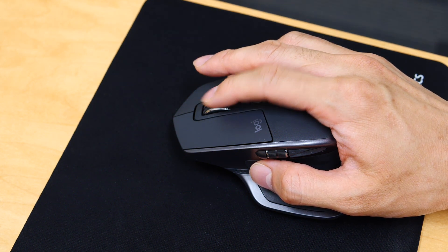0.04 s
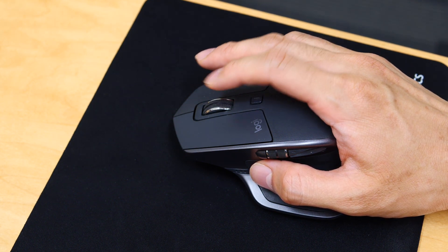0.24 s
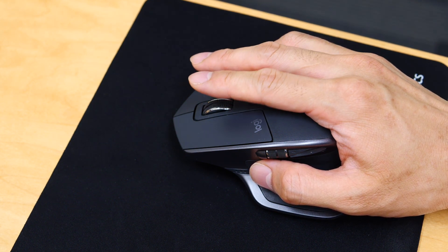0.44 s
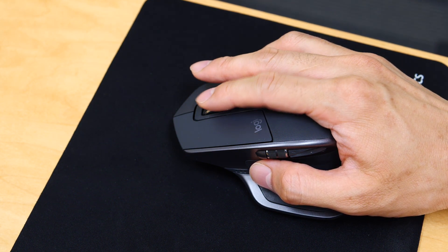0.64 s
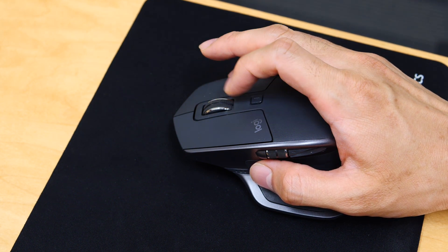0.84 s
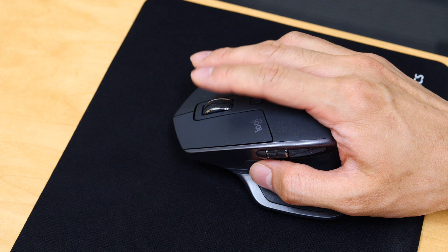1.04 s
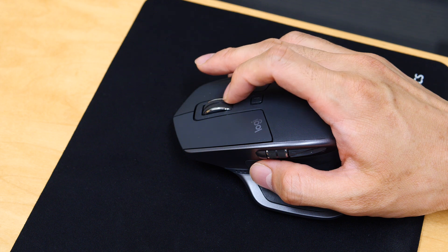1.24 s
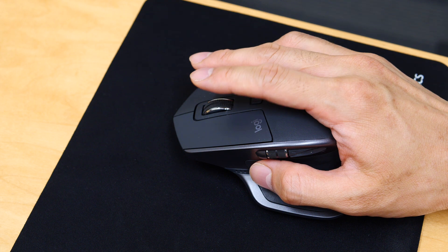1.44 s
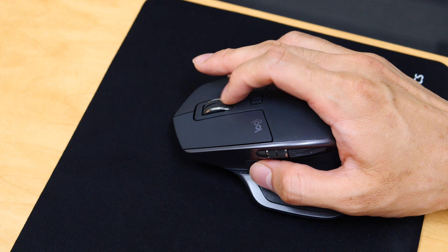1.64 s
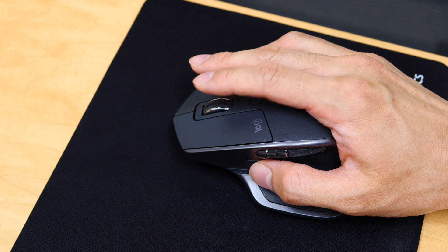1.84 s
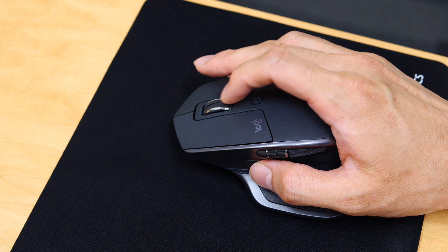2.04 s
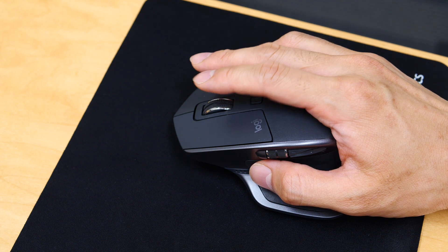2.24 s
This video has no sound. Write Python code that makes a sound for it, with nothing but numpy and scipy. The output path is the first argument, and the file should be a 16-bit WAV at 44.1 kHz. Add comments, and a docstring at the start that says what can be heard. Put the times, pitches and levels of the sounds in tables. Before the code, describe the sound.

Close by in a quiet room, a mouse scroll wheel ticks through four short, fast flicks. Its mechanism shifts with a bright clack before the first and again after the third, amid soft finger bumps and faint hiss.

```python
"""A soft rub and bump, then a rattling clack with bright metal pings: a mouse wheel's clutch shifts.
A finger flicks the ratchet wheel four times; after the third flick the clutch shifts back.
At each detent the pawl scrapes briefly, then knocks the plastic shell, which rings faintly.
The mouse is on a desk in a quiet room: soft reverberation over low rumble and hiss."""
import sys
import numpy as np
from scipy import signal
from scipy.fft import rfft, irfft, next_fast_len
from scipy.io import wavfile
from scipy.ndimage import uniform_filter1d

SR = 44100
rng = np.random.default_rng(int(sys.argv[2]) if len(sys.argv) > 2 else 0)


def put_to_file(sound):
    """Save the sound as 16-bit audio at rate SR, in the file named by the first command-line argument."""
    columns = np.atleast_2d(sound).T  # one column per channel
    safe = np.clip(columns, -1, 1)
    whole_steps = np.round(safe * 32767)
    wavfile.write(sys.argv[1], SR, whole_steps.astype(np.int16))


N = 105840

# room noise spectrum: f/Hz, relative density/dB
FLOOR_SPECTRUM = [(29, -42), (50, -9.5), (146, 0.5), (253, -5), (322, -15), (759, -12.5), (1200, -18),
                  (1750, -20), (9310, -23.5), (15000, -27)]
# room noise, side re mid: f/Hz, gain/dB
FLOOR_SIDE_GAIN = [(30, -7), (130, -52), (800, -7.5), (5000, -5.5)]
# room tail decay: f/Hz, T60/s
TAIL_DECAY = [(200, 0.39), (2000, 0.27), (14000, 0.4)]
# room tail re its input: f/Hz, gain/dB
TAIL_GAIN = [(200, 12.5), (500, 5), (1300, -8.5), (3000, -2.5), (7000, -4.5), (11000, -14.5), (15000, -14)]
# reverberation, side re mid: f/Hz, gain/dB
ROOM_SIDE_GAIN = [(150, -61), (800, -9), (2500, -6.5), (7000, -13), (14000, -5.5)]
# room sends: ratchet and taps/dB, clutch/dB, bumps and tones/dB
ROOM_SENDS_DB = (-1.5, -1.5, -3.5)
# microphone response: f/Hz, gain/dB
MIC_RESPONSE = [(30, -20), (60, -33), (95, 0), (130, -3), (300, 0), (14000, -2), (16000, -16)]
# modes of the mouse on the desk: f/Hz, level/dB, T60/s
SHELL_MODES = [(159.8, -58.5, 0.71), (351.3, -59, 0.37), (749, -55, 0.16), (949, -42, 0.036),
               (1310, -52, 0.14), (1496, -58, 0.26), (1591, -67, .095), (1800, -55.5, 0.23),
               (2508, -53.5, 0.17), (2888, -50.5, 0.1), (4760, -49.5, 0.016)]
# finger rubs, clutch motor whine, rings after clutch blows: centre t/s, 1/e half-width/s, f/Hz, level/dB
TONE_EVENTS = [(0.121, 0.03, 1058, -58), (0.743, 0.01, 1564, -57), (0.777, 0.0053, 1310, -42.5),
               (0.919, 0.017, 1350, -48), (1.256, 0.0054, 960, -39), (1.708, 0.0091, 959, -35),
               (1.712, 0.0032, 3145, -40.5), (1.722, 0.004, 1327, -34), (1.817, 0.014, 914, -34.5),
               (1.882, 0.0012, 4630, -38)]

# Contact levels are relative, ahead of each source's gain; their spectra set colour only.
# bumps on the shell: t/s, level/dB
BUMP_EVENTS = [(.1670, -29.5), (.1690, -35), (.226, -31), (.299, -32.5), (.893, -31), (1.272, -33),
               (2.181, -31.5), (2.205, -36)]
# bump: f/Hz, level/dB
BUMP_SPECTRUM = [(100, -27.5), (350, -10.5), (650, -13.5), (760, -0.5), (950, -1), (1120, -4.5),
                 (1330, 3.5), (2000, -16.5), (2550, -12), (3100, -25), (12000, -36.5)]
# clutch lever blows: t/s, thud level/dB, crack level/dB
LEVER_BLOWS = [(0.2334, -18.5, -26.5), (.2352, -16.5, -20.5), (0.2386, -23.5, -43), (0.243, -22, -43),
               (.2470, -54, -28.5), (0.3152, -27.5, -30.5), (1.7108, -26, -26.5), (1.794, -20.5, -26.5),
               (1.796, -20, -18.5), (1.7977, -17, -20), (1.8011, -27, -29.5), (1.8081, -28, -31),
               (1.8107, -22.5, -35), (1.8776, -28, -31)]
# lever thud, shifting out: f/Hz, level/dB
THUD_OUT_SPECTRUM = [(100, -36), (330, -15), (660, -21), (770, 0), (900, -2.5), (1070, 1), (1330, 3.5),
                     (1600, -2), (1850, -3), (2200, -11), (3000, -12.5), (6000, -49)]
# lever thud, shifting back: f/Hz, level/dB
THUD_BACK_SPECTRUM = [(100, -35.5), (480, -16.5), (700, -17.5), (890, 1.5), (1130, -6.5), (1500, 1.5),
                      (1850, -1), (2300, -16), (3100, -15.5), (6000, -51)]
# lever crack: f/Hz, level/dB
CRACK_SPECTRUM = [(800, -34), (2500, 8.5), (3500, 5.5), (4800, 10.5), (5600, -0.5), (6500, 8), (7500, -3.5),
                  (8600, 6.5), (11500, -13.5), (15000, -2.5)]
# metal-on-metal clutch contacts: t/s, level/dB
PING_EVENTS = [(.2275, -31), (.2317, -13), (.2350, -17.5), (.2440, -21), (.2504, -19.5), (.3150, -23),
               (1.7115, -36), (1.7906, -28), (1.7947, -43), (1.8067, -17.5), (1.8131, -24), (1.8174, -25),
               (1.8781, -22.5)]
# metal ping: f/Hz, level/dB
PING_SPECTRUM = [(3000, -32), (7500, -13.5), (9800, -7.5), (10900, 4.5), (11600, -5.5), (12500, -11),
                 (16000, -35)]
# taps of wheel play and clutch rebound: t/s, level/dB, pitch f/Hz
TAP_EVENTS = [(.3170, -24.5, 1640), (0.7082, -29.5, 1520), (0.771, -31.5, 1450), (.8880, -29.5, 1400),
              (1.3197, -29, 1345), (1.8783, -25.5, 1485), (2.094, -37.5, 1490), (2.178, -32, 1390)]
# tap pitched at 1400 Hz: f/Hz, level/dB
TAP_SPECTRUM = [(200, -7.5), (600, -16), (1400, 11.5), (1950, -15.5), (3900, -16.5), (4600, -4.5),
                (5300, -15.5), (11000, -17.5), (15000, -33)]
# detents passing the pawl: t/s, knock level/dB, scrape level/dB
DETENT_EVENTS = [(0.7999, -29, -37.5), (0.8124, -27, -38), (0.825, -25, -35), (0.8369, -25.5, -41),
                 (0.8606, -31, -42), (0.9067, -39.5, -55.5), (1.2064, -31.5, -46), (1.2235, -29, -39.5),
                 (1.2365, -26, -35), (1.2498, -26.5, -42), (1.2658, -30, -42.5), (1.3061, -32, -54),
                 (1.6432, -32.5, -46), (1.6575, -29, -41.5), (1.6702, -28.5, -36.5), (1.682, -26, -37),
                 (1.6932, -28, -42), (2.0422, -29.5, -40.5), (2.0579, -27.5, -38), (2.0695, -26.5, -35),
                 (2.0833, -26, -38), (2.104, -29, -45.5), (2.193, -45.5, -55)]
# pawl scrape: f/Hz, level/dB
SCRAPE_SPECTRUM = [(1000, -30.5), (2200, -0.5), (3000, -2.5), (3550, -7.5), (4700, 0), (5600, -6.5),
                   (6600, -2.5), (9000, -11), (10900, 1), (12300, -13), (14000, -7.5), (16000, -11)]
# pawl knock at mean strength: f/Hz, level/dB
KNOCK_SPECTRUM = [(150, -29), (370, -18.5), (620, -24.5), (930, -1), (1150, -8), (1450, 5), (1780, -0.5),
                  (1980, -12), (2150, -2.5), (2500, -38), (2850, -14), (3400, -31.5), (4700, -24),
                  (9000, -40)]


def amp(db):
    """Decibels to gain."""
    return 10 ** (np.asarray(db) / 20)


def curve_at(points, hz):
    """Interpolate (f/Hz, value) points on a log frequency axis."""
    knots_hz, values = np.transpose(points)
    return np.interp(np.log(hz + 1), np.log(knots_hz + 1), values)


def decay(t, t60_s):
    """Exponential fall, 60 dB in t60_s."""
    return amp(-60 * t / t60_s)


def filtered(x, gains, top_hz=np.inf):
    """Zero-phase filter through (f/Hz, gain/dB) points, cut at top_hz."""
    size = next_fast_len(N + SR // 2)
    hz = np.fft.rfftfreq(size, 1 / SR)
    response = amp(curve_at(gains, hz)) * (hz < top_hz)
    return irfft(rfft(x, size) * response, size)[..., :N]


def detuned(spectrum, ratio):
    """Spectrum shifted in pitch."""
    return [(hz * ratio, db) for hz, db in spectrum]


def minimum_phase(spectrum, size=2048):
    """Causal impulse with the given spectrum."""
    hz = np.fft.rfftfreq(size, 1 / SR)
    cepstrum = irfft(np.log(amp(curve_at(spectrum, hz))))
    cepstrum[1:size // 2] *= 2
    cepstrum[size // 2 + 1:] = 0
    return irfft(np.exp(rfft(cepstrum)))


def burst(t60_s, size=2048):
    """Micro-contact cluster that swells and dies; even spectrum, unit energy."""
    t = np.arange(size) / SR
    envelope = np.sqrt(t) * decay(t, t60_s)
    envelope /= envelope.max()
    cluster = rng.standard_normal(size) * envelope
    for _ in range(6):
        whitened = irfft(np.exp(1j * np.angle(rfft(cluster))))
        cluster = whitened * np.minimum(1, 2 * envelope)
    return cluster / np.linalg.norm(cluster)


def diffuse_noise(size=2048):
    """Two noises of about 1 s with even short-time spectra."""
    noise = rng.standard_normal((2, SR))
    for _ in range(4):
        frames = signal.stft(noise, nperseg=size)[2]
        noise = signal.istft(np.exp(1j * np.angle(frames)), nperseg=size)[1]
    return noise / noise.std()


def strikes(events, spectrum, t60_s=None, vary_db=0):
    """Contacts at (t/s, level/dB): clean impulses, or bursts given t60_s. vary_db scatters colour."""
    out = np.zeros(N + SR)
    hz, spectrum_db = np.transpose(spectrum)
    for start_s, db in events:
        varied_db = spectrum_db + vary_db * rng.standard_normal(len(hz))
        body = minimum_phase(np.transpose([hz, varied_db]))
        body /= np.abs(body).max()
        hit = signal.fftconvolve(body, burst(t60_s)) if t60_s else body
        out[round(start_s * SR):][:len(hit)] += amp(db) * hit
    return out[:N]


def background(floor_db=-60, hum_db=-49.5, hum_hz=149.7, hum_peak_s=0.764, hum_half_width_s=0.11):
    """Room rumble and hiss; a low hum swells once."""
    mid, side = filtered(rng.standard_normal((2, N)), FLOOR_SPECTRUM)
    side = filtered(side, FLOOR_SIDE_GAIN)
    floor = amp(floor_db) * np.array([mid + side, mid - side]) / mid.std()
    t = np.arange(N) / SR
    swell = np.exp(-((t - hum_peak_s) / hum_half_width_s) ** 2)
    return floor + amp(hum_db) * swell * np.sin(2 * np.pi * hum_hz * t)


def room(x):
    """Early desk reflections, then a diffuse tail with a faint, slower late decay."""
    early_db, early_t60_s, early_lag_s = -6, 0.0513, 0.001011
    tail_lag_s, late_db, late_t60_s = 0.008, -25, 0.95
    hz, t, frames = signal.stft(diffuse_noise(), SR, nperseg=256)
    t60_s = curve_at(TAIL_DECAY, hz)[:, None]
    unit_energy = np.sqrt(2 * np.log(1000) / (t60_s * SR))
    gain = amp(curve_at(TAIL_GAIN, hz))[:, None] * unit_energy
    envelope = decay(t, t60_s) + amp(late_db) * decay(t, late_t60_s)
    tail = signal.istft(frames * gain * envelope, SR, nperseg=256)[1]
    response = np.pad(tail, ((0, 0), (round(tail_lag_s * SR), 0)))
    early = amp(early_db) * np.array([burst(early_t60_s), burst(early_t60_s)])
    response[:, round(early_lag_s * SR):][:, :early.shape[1]] += early
    mid, side = signal.fftconvolve(x[None], response, axes=1)[:, :N]
    side = filtered(side, ROOM_SIDE_GAIN)
    return np.array([mid + side, mid - side])


def shell(x):
    """Contacts plus the faint ring they excite in the shell's modes."""
    t = np.arange(SR // 2) / SR
    ring = sum(amp(db) * decay(t, t60_s) * np.cos(2 * np.pi * hz * t) for hz, db, t60_s in SHELL_MODES)
    return x + signal.fftconvolve(x, ring)[:N]


def wavering_tones(waver_rms_hz=75):
    """Brief tones: finger rubs, the clutch motor's whine, rings after clutch blows."""
    t, out = np.arange(N) / SR, np.zeros(N)
    for centre_s, half_width_s, hz, db in TONE_EVENTS:
        waver = uniform_filter1d(rng.standard_normal(N), size=256)
        phase = 2 * np.pi * np.cumsum(hz + waver_rms_hz * waver / waver.std()) / SR
        swell = np.exp(-((t - centre_s) / half_width_s) ** 2)
        out += amp(db) * swell * np.sin(phase)
    return out


def bumps():
    """Finger and wheel bump softly against the shell."""
    return strikes(BUMP_EVENTS, BUMP_SPECTRUM, t60_s=0.0176)


def clutch(thud_gain_db=2, crack_gain_db=10, ping_gain_db=3.5, back_after_s=1):
    """The lever rattles home with thuds and cracks; metal contacts ping."""
    thuds = np.zeros(N)
    for start_s, db, _ in LEVER_BLOWS:
        spectrum = THUD_OUT_SPECTRUM if start_s < back_after_s else THUD_BACK_SPECTRUM
        thuds += strikes([(start_s, db)], spectrum, t60_s=0.006)
    cracks = strikes([(start_s, db) for start_s, _, db in LEVER_BLOWS], CRACK_SPECTRUM, t60_s=0.01)
    pings = strikes(PING_EVENTS, PING_SPECTRUM, t60_s=0.0046)
    return amp(thud_gain_db) * thuds + amp(crack_gain_db) * cracks + amp(ping_gain_db) * pings


def ringing_taps(reference_hz=1400):
    """Light ringing taps: the wheel's play and the clutch's rebound clacks."""
    return sum(strikes([(start_s, db)], detuned(TAP_SPECTRUM, hz / reference_hz), t60_s=0.0034)
               for start_s, db, hz in TAP_EVENTS)


def pawl_scrapes(gain_db=15.5, lag_s=0.0001):
    """The pawl scrapes over each tooth."""
    events = [(start_s + lag_s, db + gain_db) for start_s, _, db in DETENT_EVENTS]
    return strikes(events, SCRAPE_SPECTRUM, t60_s=0.008, vary_db=3.5)


def pawl_knocks(gain_db=1, lag_s=0.001072, pitch_sag_per_db=0.012):
    """The pawl drops into each notch; harder knocks sound lower."""
    mean_db = np.mean([db for _, db, _ in DETENT_EVENTS])
    out = np.zeros(N)
    for start_s, db, _ in DETENT_EVENTS:
        spectrum = detuned(KNOCK_SPECTRUM, 1 - pitch_sag_per_db * (db - mean_db))
        out += strikes([(start_s + lag_s, db + gain_db)], spectrum, vary_db=1.5)
    return out


def scene(pan_right_db=0.4):
    """Mouse and reverberation, slightly right of centre, over the background."""
    ratchet = pawl_scrapes() + pawl_knocks()
    sources = [ratchet + ringing_taps(), clutch(), bumps() + wavering_tones()]
    send = sum(amp(db) * source for db, source in zip(ROOM_SENDS_DB, sources))
    mouse = shell(sum(sources)) + room(shell(send))
    return mouse * amp([[-pan_right_db], [pan_right_db]]) + background()


def record(dry):
    """Band-limited microphone; thins the deep bass and the very top."""
    return filtered(dry, MIC_RESPONSE, top_hz=16000)


dry = scene()
out = record(dry)
put_to_file(out)
```